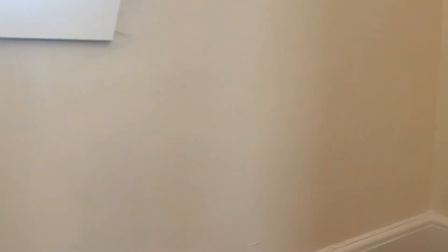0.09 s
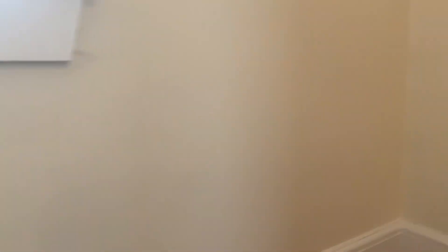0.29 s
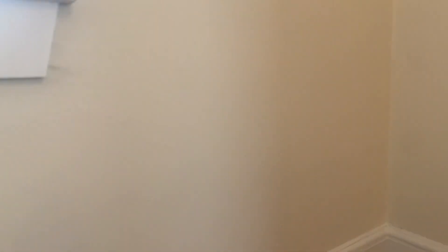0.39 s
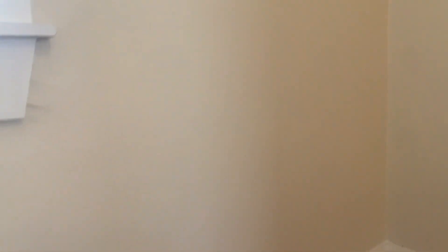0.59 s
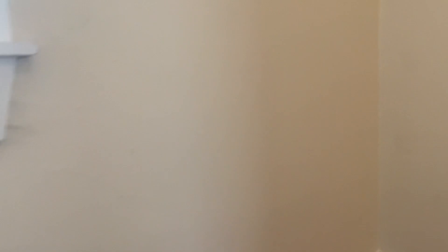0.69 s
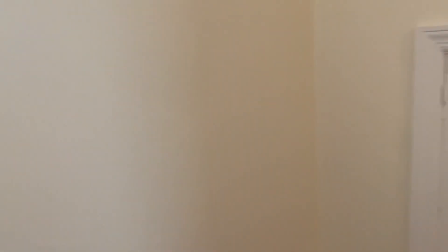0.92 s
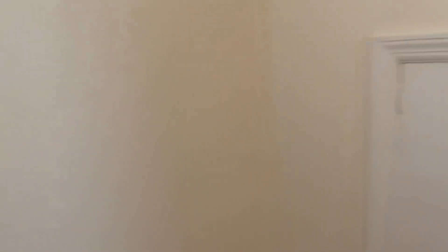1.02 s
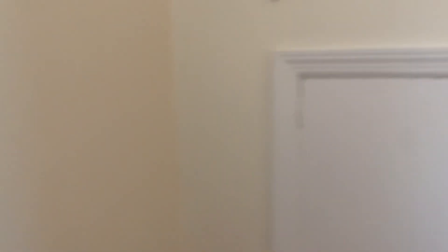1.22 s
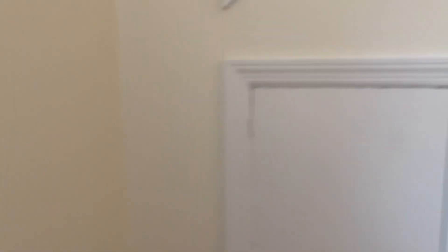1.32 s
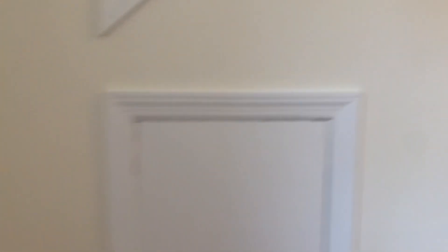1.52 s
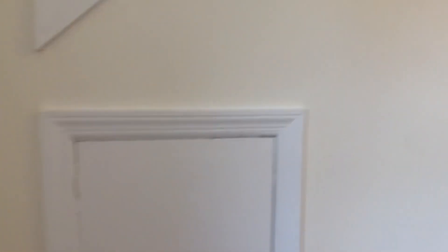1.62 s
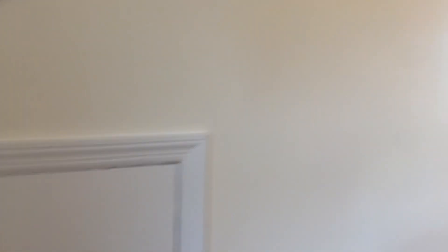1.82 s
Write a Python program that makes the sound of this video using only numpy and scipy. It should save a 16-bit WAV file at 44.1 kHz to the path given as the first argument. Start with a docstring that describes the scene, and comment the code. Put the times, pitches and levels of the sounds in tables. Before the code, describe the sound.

Dry knocks on a handheld camera body dominate: a loud, dull bump at 0.24 seconds, then more at 0.29 and 0.36, with tiny ticks and rattle. A faint wooden step precedes them at 0.04. Softer steps follow, a clearer one near 0.9, then a hard heel thud and clattering clacks from 1.2 to 1.5. Bare walls echo briefly over quiet hiss and intermittent low rumble.

```python
"""An empty house with wooden boards, where someone walks carrying a small stereo camera.
Steps are gritty noise bursts through board resonances, with damped clacks and dispersive heel thuds;
bare rooms answer with a noise tail. Three dry knocks on the camera body are damped modes (a tick and
a short shell ring), band-limited rattle and low swings that fall in pitch; more faint swings follow.
Under it all lie shaped-noise hiss and a low rumble that comes and goes."""
import sys
import numpy as np
from scipy import signal
from scipy.fft import rfft, irfft
from scipy.io import wavfile
from scipy.ndimage import uniform_filter1d

SR = 44100
rng = np.random.default_rng(int(sys.argv[2]) if len(sys.argv) > 2 else 0)


def file_out(sig):
    """Save sig as 16-bit WAV at sys.argv[1]."""
    # one column per channel
    cols = np.atleast_2d(sig).T
    # limit, then scale
    lim = np.clip(cols, -1, 1)
    pcm = np.round(lim * 32767).astype(np.int16)
    wavfile.write(sys.argv[1], SR, pcm)


N = 83790


def undb(db):
    """Decibel law: a level in dB becomes an amplitude ratio."""
    return 10 ** (np.asarray(db) / 20)


def on_log(table, hz):
    """Logarithmic frequency scale: interpolate (frequency [Hz], value) points along it."""
    table = np.array(table, float)
    return np.interp(np.log(np.maximum(hz, 1)), np.log(table[:, 0]), table[:, 1])


def bin_hz(size):
    """Fourier analysis: the frequencies of the bins of a real transform."""
    return np.arange(size // 2 + 1) * SR / size


def colour(x, db):
    """Zero-phase filtering: scale each spectral bin by a function of Hz that gives dB."""
    size = x.shape[-1]
    return irfft(rfft(x) * undb(db(bin_hz(size))), size)


def causal(x, db):
    """Minimum-phase filtering: a folded cepstrum makes the response start at once and then ring."""
    size = len(x)
    cepstrum = irfft(db(bin_hz(size)) * np.log(10) / 20, size)
    cepstrum[1:size // 2] *= 2
    cepstrum[size // 2 + 1:] = 0
    return irfft(rfft(x) * np.exp(rfft(cepstrum)), size)


def unit(x):
    """Normalization: scale to a root-mean-square of one."""
    return x / np.sqrt(np.mean(x ** 2))


def wide_noise(side, size):
    """Mid-side stereo: white noise in the mid, independent noise of the given balance in the side."""
    mid, diff = rng.standard_normal((2, size))
    diff = colour(diff, lambda hz: on_log(side, hz))
    return mid + diff * np.array([[1], [-1]])


def add(out, at, sound):
    """Superposition: mix a sound in from a time [s] on."""
    i = int(at * SR)
    out[..., i:i + sound.shape[-1]] += sound[..., :out.shape[-1] - i]


def ring(db, hz, t60, rise, lead):
    """Damped mode: a sine that decays exponentially, the right side leading in phase [rad]."""
    t = np.arange(int(1.5 * t60 * SR)) / SR
    phase = 2 * np.pi * hz * t + np.array([[-lead], [lead]]) / 2
    onset = (1 - np.exp(-t / rise)) ** 2
    return undb(db - 60 * t / t60) * onset * np.sin(phase)


def bend(db, peak, turns, lead, sharp):
    """Bending-wave dispersion: high pitches arrive first, so phase grows with the root of time."""
    t = np.arange(SR // 5) / SR
    phase = 2 * np.pi * turns * np.sqrt(t) + np.array([[-lead], [lead]]) / 2
    swell = (t / peak * np.exp(.5 - .5 * (t / peak) ** 2)) ** sharp  # reaches one at the peak time
    return undb(db) * swell * np.cos(phase)


def house():
    """Stationary noise under slow level curves: a hiss that dips and a low rumble in lumps."""
    # spectral shape of the hiss: (frequency [Hz], relative density [dB])
    hiss_shape = [(15, -31), (32, 1), (77, -1.5), (221, -17.5), (421, -15.5), (826, -18), (1710, -21.5),
                  (6550, -35), (11500, -40.5), (13500, -46), (15500, -39.5)]
    # stereo width of both noises: (frequency [Hz], side over mid [dB])
    house_width = [(60, -9.5), (110, -17.5), (200, -7), (380, -4.5), (700, -3.5), (1290, -1), (2380, -2.5),
                   (4400, 0.5), (8120, 0.5), (15000, 2.5)]
    # hiss over time: (time [s], level above the base level [dB])
    hiss_curve = [(0, 0.5), (.12, 1.5), (.16, -11), (.23, 1.5), (.4, 0.5), (.62, 0), (.76, -0.5), (.88, 0),
                  (1.9, 3)]
    # low rumble over time: (time [s], level before the lumps [dB])
    rumble_curve = [(0.0, -58), (0.167, -64), (0.29, -38), (0.31, -52), (0.36, -42.5), (0.39, -39),
                    (0.432, -56), (0.644, -57.5), (0.74, -69.5), (0.85, -61), (0.952, -75), (1.248, -57),
                    (1.38, -50), (1.486, -50.5), (1.762, -74), (1.9, -91)]
    base_db = -60
    t = np.arange(N) / SR
    hiss = unit(colour(wide_noise(house_width, N), lambda hz: on_log(hiss_shape, hz)))
    hiss = hiss * undb(base_db + np.interp(t, *np.array(hiss_curve).T))
    low_band = signal.butter(2, [42, 110], "band", fs=SR, output="sos")
    low = signal.sosfilt(low_band, wide_noise(house_width, N))
    lumps = uniform_filter1d(rng.standard_normal(N // 1024 + 1).repeat(1024), size=1024)[:N]
    rumble_db = np.interp(t, *np.array(rumble_curve).T) + 1.3 * np.tanh(lumps)
    return hiss + unit(low) * undb(rumble_db)


def wood(hz):
    """Resonance: the sole's broad spectrum and the boards' peaks add as powers, given in dB."""
    # broad spectrum of the sole: (frequency [Hz], relative density [dB])
    sole_shape = [(59, -31.5), (100, -15), (287, -3.5), (668, -13.5), (758, -19), (1210, -13),
                  (6660, -25.5), (8580, -43), (9950, -32), (15500, -45)]
    # resonances of the boards: (frequency [Hz], width [Hz], level before board_db [dB])
    board_modes = [(118.4, 16.6, 0.5), (177, 18.7, 5.5), (285.4, 28.5, 5.5), (444, 50, 0), (630, 35, -6.5),
                   (742, 77, -11.5), (963, 33, -5.5), (1430, 360, -19), (1956, 160, -9.5), (2240, 220, -9)]
    board_db, low_cut_hz = -4.5, 95  # steps carry little below the low cut
    peaks = sum(undb(db) ** 2 / (1 + (2 * (hz - f) / width) ** 2) for f, width, db in board_modes)
    low_cut = 1 / (1 + (low_cut_hz / np.maximum(hz, 20)) ** 6)
    power = undb(on_log(sole_shape, hz)) ** 2 + undb(board_db) ** 2 * peaks
    return 10 * np.log10(power * low_cut)


def steps():
    """Source and filter: each gritty noise burst swells, dies and excites the boards."""
    # footfalls: (time [s], level [dB], boom of the boards [dB], tilt above 600 Hz [dB per octave],
    # rise time constant [s], scuff decay constant [s])
    footfalls = [(0.037, -56.5, -2, -3.5, 0.0027, 0.015), (0.07, -58.5, 11.5, -9, 0.0022, 0.0083),
                 (0.42, -53.5, 2.5, -6, 0.01, 0.023), (.53, -59.5, 5, -6, 0.0027, 0.035),
                 (0.642, -61.5, -3, 5.5, 0.029, 0.084), (0.847, -60, 3, 0.5, 0.0077, 0.013),
                 (0.893, -52, -12, -0.5, 0.0055, 0.0053), (0.908, -39.5, 14, 1.5, 0.0013, 0.014),
                 (0.965, -47, 11, 0.5, 0.0061, 0.0098), (1.179, -48, 6.5, -1, 0.0033, 0.0058),
                 (1.189, -40, 13.5, 0, 0.0015, 0.042), (1.25, -38.5, 7.5, -3, 0.0028, 0.011),
                 (1.276, -45, 0, -3, 0.0027, 0.017), (1.333, -44.5, -5, -4.5, .003, 0.03),
                 (1.372, -45.5, -14, -2, 0.011, 0.03), (1.309, -42.5, -6.5, -2.5, 0.00046, 0.0066),
                 (1.4, -42.5, 15.5, 6.5, 0.011, 0.0084), (1.409, -38, 1.5, 1, 0.0033, 0.002),
                 (1.421, -47, -13, -9, 0.0026, 0.0055), (1.435, -39.5, -3.5, -6.5, 0.00048, 0.0074),
                 (1.451, -52, -2, -4, 0.0017, .004), (1.467, -50.5, 6, 1, 0.0012, 0.0053),
                 (1.488, -51, -8.5, 2, 0.0047, 0.01), (1.518, -53, -0.5, -7.5, 0.00092, 0.0034)]
    boom_hz, grit_db = 343, 4  # the boom lies below boom_hz
    out, size = np.zeros(N), 32768
    t = np.arange(size) / SR
    for at, db, boom_db, tilt_db, rise, length in footfalls:
        grains = np.minimum(rng.exponential(size=size // 64), 3).repeat(64)
        grit = rng.standard_normal(size) * undb(grit_db * grains)
        burst = grit * (1 - np.exp(-t / rise)) ** 2 * np.exp(-t / length)
        burst = causal(burst, lambda hz: wood(hz) + tilt_db * np.log2(np.maximum(hz / 600, 1))
                       + boom_db / (1 + (hz / boom_hz) ** 4))
        # equal energy: the level is that of the burst's energy spread over 10 ms
        add(out, at, undb(db) * burst / np.sqrt(np.sum(burst ** 2) / 441))
    return out


def clacks():
    """Impact excitation: hard clacks of the sole's edge sound as damped modes."""
    # clacks: (time [s], level [dB], frequency [Hz], decay by 60 dB [s])
    edge_hits = [(0.041, -47, 1420, 0.013), (.8990, -49.5, 1270, 0.044), (1.2540, -36.5, 1550, 0.028),
                 (1.256, -39.5, 1340, 0.016), (1.2540, -40, 930, 0.011), (1.3128, -33, 1285, 0.026),
                 (1.314, -37.5, 1620, .02), (1.3135, -36.5, 700, .025), (1.32, -32, 1310, 0.019),
                 (1.412, -31.5, 1335, 0.058), (1.4140, -29, 761, 0.056), (1.4160, -34.5, 2260, 0.029),
                 (1.417, -32, 300, 0.081)]
    out = np.zeros((2, N))
    for at, db, hz, t60 in edge_hits:
        add(out, at, ring(db, hz, t60, 0.00028, 0.7))
    return out


def thuds():
    """Flexural dispersion: heel thuds close by bend the boards, and their pitch falls."""
    # thuds: (time [s], envelope peak [dB], time to peak [s])
    heel_hits = [(0.9034, -41, 0.0096), (.970, -47.5, 0.014), (1.189, -40.5, 0.0087),
                 (1.2544, -22.5, 0.011), (1.2787, -28.5, 0.011), (1.2908, -30.5, 0.011),
                 (1.3154, -29, 0.011), (1.3403, -34, 0.011), (0.044, -47, 0.017), (0.062, -52, 0.0075)]
    turns, lead = 33, 0.34  # turns per root second, radians
    out = np.zeros((2, N))
    for at, db, peak in heel_hits:
        add(out, at, bend(db, peak, turns, lead, 1.23))
    return out


def room(x):
    """Reverberation: bare walls give a noise tail in which each octave dies at its own rate."""
    # reverberation time: (frequency [Hz], decay by 60 dB [s])
    room_decay = [(60, 0.1), (250, 0.43), (1000, 0.68), (4000, 0.57), (14000, 0.088)]
    # stereo width of the tail: (frequency [Hz], side over mid [dB])
    room_width = [(60, -14), (110, -2.5), (200, -20), (380, -4), (700, -2), (1290, -3), (2380, 0.5),
                  (4400, -1.5), (8120, 3), (15000, -1.5)]
    noise, t, tail = wide_noise(room_width, SR), np.arange(SR) / SR, 0
    for hz in 40 * 2. ** np.arange(9):
        t60 = on_log(room_decay, hz)

        def octave_db(f):
            """Overlapping filter bank: a triangle on the octave axis, in dB."""
            triangle = 1 - np.abs(np.log2(np.maximum(f, 1) / hz))
            return 20 * np.log10(np.maximum(triangle, 1e-4))

        decay = undb(-60 * t / t60) * (1 - np.exp(-t / 0.00067))
        tail = tail + colour(noise, octave_db) * decay / np.sqrt(t60 * SR / 14)
    return signal.fftconvolve(x[None], tail, axes=1)[:, :N]


def taps():
    """Modal excitation: each tap on the camera body sets off a ring, a tick and upper shell modes."""
    # taps: (time [s], ring level [dB], ring frequency [Hz], ring decay by 60 dB [s],
    # upper ring level [dB], tick level [dB])
    shell_taps = [(.2421, -23, 697, 0.015, -16, -30.5), (.2428, -5, 502, 0.018, -42, -28),
                  (.2875, -10, 698, 0.012, -21, -44.5), (.2917, -14, 473, 0.043, -26, -57),
                  (0.296, -14, 480, 0.018, -38, -58), (.2990, -47, 1397, .04, -48.5, -63),
                  (.3626, -9, 635, 0.012, -23.5, -42), (.3655, -15, 538, 0.026, -30, -56.5),
                  (.3690, -19.5, 594, 0.039, -37, -45.5), (.3722, -16.5, 680, 0.015, -33.5, -44.5),
                  (.3790, -22.5, 594, 0.018, -32, -48), (0.386, -26.5, 447, 0.02, -40.5, -56)]
    # modes of the tick: (frequency [Hz], level over the tick level [dB], decay by 60 dB [s])
    tick_modes = [(3470, -15.5, .007), (3730, -11, 0.0088), (4880, -6.5, 0.0095), (6410, 11, 0.005),
                  (7660, -3.5, 0.0067), (11100, -15, 0.0051)]
    # upper shell modes: (frequency [Hz], level over the upper ring level [dB], decay by 60 dB [s])
    upper_modes = [(911, 3, 0.014), (1085, 6.5, 0.0078), (1325, -4.5, 0.011), (1854, -12, 0.016)]
    ring_lead, upper_lead, tick_lead = 1.18, 1.85, 1.86  # radians by which the right side leads
    out = np.zeros((2, N))
    for at, db, hz, t60, upper_db, tick_db in shell_taps:
        add(out, at, ring(db, hz, t60, 0.00084, ring_lead))
        for mode_hz, mode_db, mode_t60 in tick_modes:
            add(out, at, ring(tick_db + mode_db, mode_hz, mode_t60, 0.0005, tick_lead))
        for mode_hz, mode_db, mode_t60 in upper_modes:
            add(out, at, ring(upper_db + mode_db, mode_hz, mode_t60, 0.00059, upper_lead))
    return out


def swings():
    """Falling instantaneous frequency: the camera body swings slower and slower and dies away."""
    # swings: (time [s], envelope peak [dB], time to peak [s], rate [turns per root second])
    body_swings = [(.2427, -10, .0205, 20.2), (.2424, -19, .0055, 32), (.2870, -27, .007, 32),
                   (.3640, -22, .005, 32), (.3725, -17, .0075, 19), (.3720, -30, .025, 20.3),
                   (.4730, -44, .014, 22), (.5300, -46, .01, 20.4), (1.3000, -36, .03, 15),
                   (1.3950, -44, .03, 18)]
    out = np.zeros((2, N))
    for at, db, peak, turns in body_swings:
        add(out, at, bend(db, peak, turns, 0.62, 1))  # lead in radians
    return out


def rattles():
    """Band-limited noise: something loose in the shell rattles near the upper ring and the tick."""
    # rattles: (time [s], length [s], starting level near the upper ring [dB], and near the tick [dB])
    loose_bursts = [(0.248, 0.056, -49.5, -61.5), (0.2852, 0.011, -33, -67.5), (0.312, 0.087, -73.5, -62.5),
                    (0.342, 0.0063, -66, -59), (0.362, 0.031, -36.5, -56)]
    out = np.zeros((2, N))
    for at, length, upper_db, tick_db in loose_bursts:
        size = int(length * SR)
        fade = signal.windows.tukey(size, .2) * undb(np.linspace(0, -14, size))
        for db, band_hz in (upper_db, [750, 1800]), (tick_db, [5700, 7300]):
            grains = rng.exponential(size=64).repeat(64)
            grit = rng.standard_normal((2, 4096)) * undb(2.5 * grains)
            grit = signal.sosfilt(signal.butter(4, band_hz, "band", fs=SR, output="sos"), grit)
            add(out, at, undb(db) * unit(grit)[:, :size] * fade)
    return out


def scene():
    """Superposition: direct sounds, their reverberation, the camera body and the house add up."""
    feet, edges, heels = steps(), clacks(), thuds()
    step_send_db, thud_send_db, clack_send_db = 4, -23.5, -10  # levels into the room
    wet = room(undb(step_send_db) * feet + undb(thud_send_db) * heels[0]
               + undb(clack_send_db) * edges[0])
    port_lag_s = 0.00021  # the left port hears steps later
    direct = np.array([np.roll(feet, int(port_lag_s * SR)), feet])
    body = taps() + swings() + rattles()
    return house() + direct + edges + heels + wet + body


def record(dry):
    """Low-pass filtering: the recorder cuts the top with a steep elliptic filter."""
    top_hz = 15800
    return signal.sosfilt(signal.ellip(8, .2, 70, top_hz, fs=SR, output="sos"), dry)


dry = scene()
out = record(dry)
file_out(out)
```